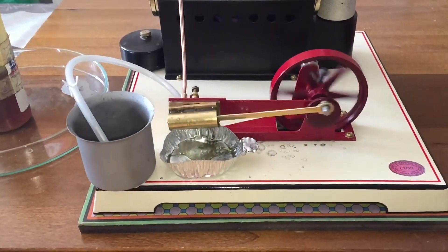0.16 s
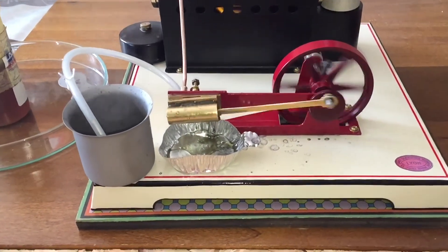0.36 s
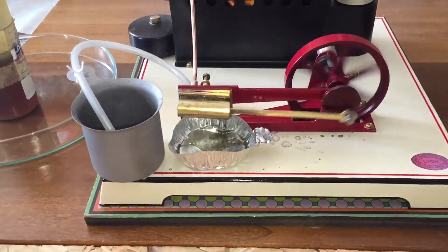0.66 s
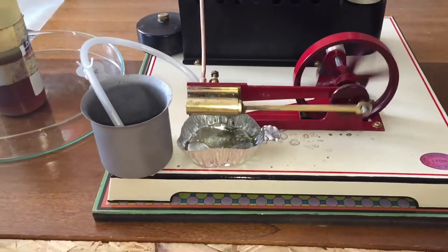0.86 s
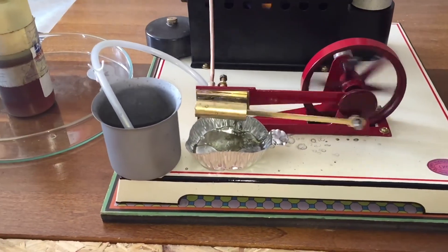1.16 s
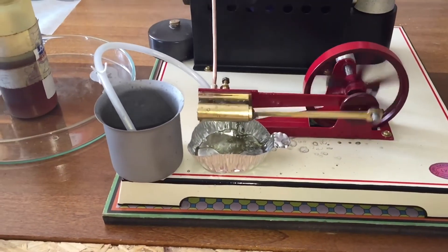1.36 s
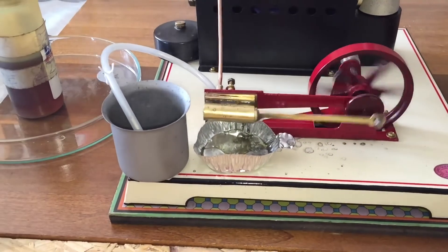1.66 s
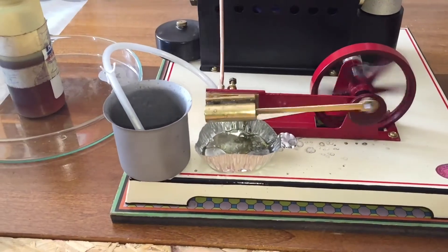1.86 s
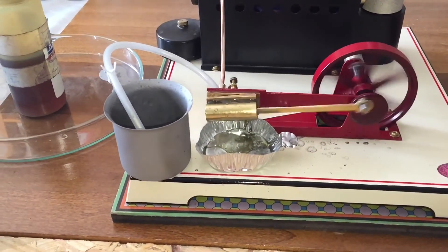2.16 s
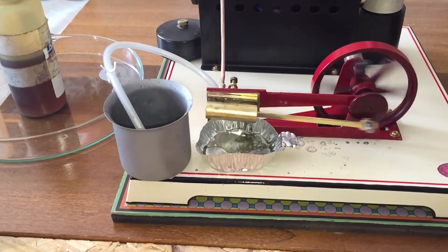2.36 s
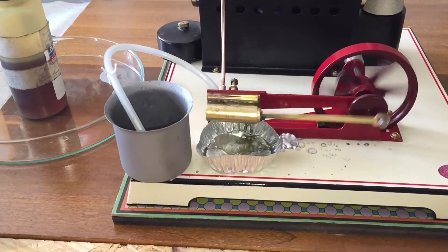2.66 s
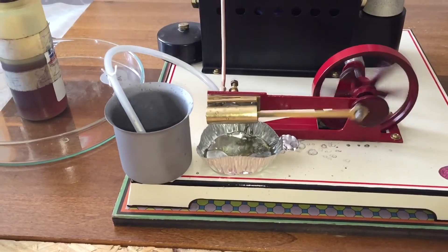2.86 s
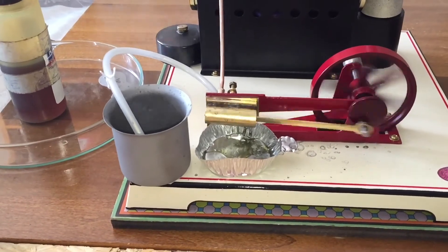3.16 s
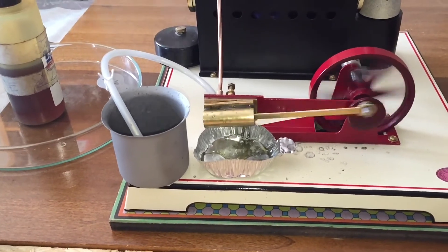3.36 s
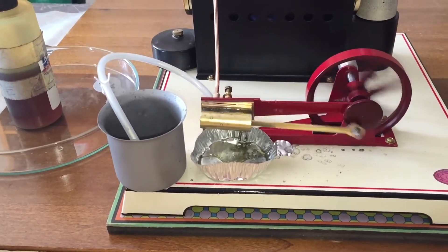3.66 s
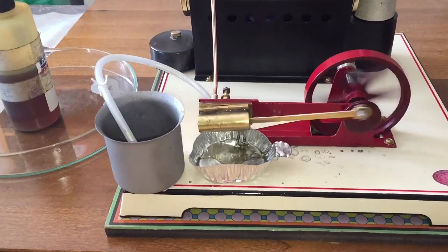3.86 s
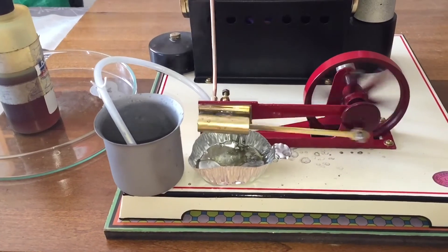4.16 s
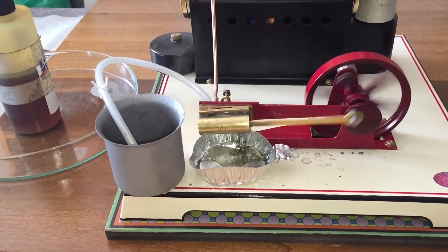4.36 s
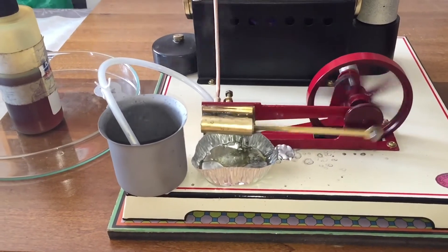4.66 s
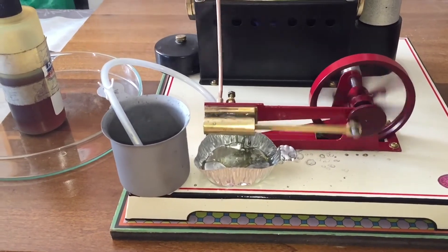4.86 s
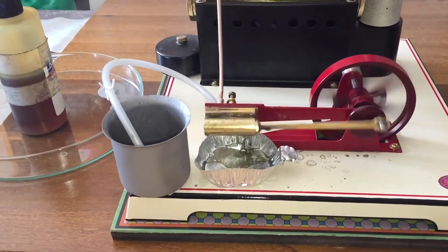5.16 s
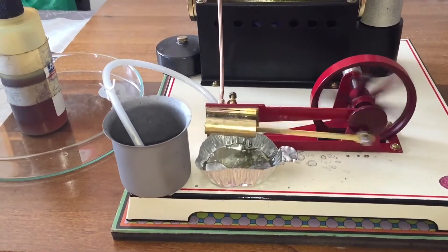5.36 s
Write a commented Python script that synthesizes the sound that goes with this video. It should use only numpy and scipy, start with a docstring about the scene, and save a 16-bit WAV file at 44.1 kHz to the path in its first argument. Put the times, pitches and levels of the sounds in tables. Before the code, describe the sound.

A toy steam engine runs on a thin base plate on a wooden table, recorded closely by a phone in a small room. At 0 s the tail of one steam puff fades over a soft metallic whirr; the next puff starts near 0.1 s. Puffs come about five per second, nearly six at 1 s, about seven at 2 s and just over eight from 4 s to the end at 5.5 s. Each is a bright, gritty hiss lasting roughly half a turn, with a hollow hoot around 1.6 kHz from the hose and a metallic cup ring. At its start the cylinder slaps and the loose crank knocks, a hard tick followed by a short plate clank and bounce. Knocks strengthen until about 2 s. Tiny toots stand out near 0.6, 0.9, 1.4 and 3 s. Light taps and thin seeping steam fill the gaps; table rumble and, after 3 s, a deep murmur stay faint.

```python
"""The tail of a steam puff and a soft mechanical whirr open; then a toy steam engine puffs and knocks ever faster.
It stands on a thin base plate on a wooden table, close to a phone. The exhaust is noise gated by a port for
about half of each turn, colouring and hooting as it leaves a hose into a metal cup. The cylinder slaps, and
the loose crank and rod knock and bounce: short blows into decaying modes of frame, plate, base and table.
Brief toots, light taps, seeping steam, table rumble and a deep house murmur fill in around them."""
import sys
import numpy as np
from scipy import signal
from scipy.fft import rfft, irfft
from scipy.io import wavfile
from scipy.ndimage import uniform_filter1d

SR = 44100
rng = np.random.default_rng(int(sys.argv[2]) if len(sys.argv) > 2 else 0)


def transcribe(u):
    """Save the signal u as a 16-bit wav file named by the first command-line argument.

    u: samples, shape (n,) or (channels, n), limited to [-1, 1]; the rate is SR.
    q: integer samples, one column per channel.
    """
    v = np.clip(np.atleast_2d(u).T, -1, 1)
    q = np.round(v * 32767).astype(np.int16)
    wavfile.write(sys.argv[1], SR, q)


N = 242991  # length in samples

# flywheel speed: (time [s], speed [turns/s])
SPEED = [(0, 4.573), (1, 5.846), (2, 6.829), (3, 7.561), (4, 8.197), (5.51, 8.413)]
START_TURN = 0.511  # share of the turn already past at 0 s; the exhaust port opens at each whole turn

# steam flow through the port over one turn: (share of turn [0-1], level [dB])
PORT = [(0, -14), (.04, -2.5), (.09, 2), (.2, 0.5), (.3, 1), (.41, 1.5), (.46, -2.5), (.52, -13.5),
        (.6, -50), (.93, -47), (1, -6.5)]
# colour of the jet in the cup, with its dips: (frequency [Hz], relative density [dB per Hz])
JET_COLOUR = [(80, -46), (200, -16), (700, -10.5), (1100, -20), (1600, -9), (3400, -6.5), (4350, -21),
              (4800, -8.5), (5900, -6.5), (7000, -7.5), (7300, -17), (7700, -9.5), (9800, -14.5),
              (10500, -17.5), (11100, -11), (11700, -18), (12500, -10), (14000, -13.5), (14800, -4),
              (15500, -13.5)]
# air and wall resonances of the cup, before the jet colour: (frequency [Hz], width [Hz], gain over the jet [dB])
CUP = [(803, 92, 6.5), (5114, 27.3, 9), (5144, 140, 10.5), (5800, 640, -5), (7500, 230, -2.5),
       (7970, 100, -9), (8920, 150, 1.5), (9900, 140, -0.5), (11130, 80, 5.5), (11800, 100, 0.5),
       (12630, 460, -1), (13640, 460, -8.5)]
# hooting note of the hose: (time [s], frequency [Hz])
HOSE_NOTE = [(0, 1555), (1, 1539), (2, 1565), (3, 1582), (4, 1609), (5.51, 1594)]
HOSE_WIDTH_HZ = 105
HISS_DB, HISS_SCATTER_DB = -38.5, 0.53  # before the port; scatter from puff to puff
HOSE_SWAY_DB = 2  # the hose shifts in the cup, so each puff favours other resonances
HOOT_DB, HOOT_DB_PER_TURN_S, HOOT_SCATTER_DB = -44.5, -0.67, 2.0  # before the port, at 8 turns/s

# loose parts rattling round the turn, at 8 turns/s: (share of turn [0-1], relative level [dB])
RATTLE = [(0, -66), (.2, -50), (.45, -59), (.6, -56), (.8, -54), (.9, -60), (1, -33)]
RATTLE_DB_PER_TURN_S = 3.5  # louder with speed
# modes that keep ringing between blows: (frequency [Hz], relative level [dB], t60 [s])
WHIRR = [(700, -17.5, 0.1), (781, -7, 0.14), (896, -4.5, 0.15), (1225.5, -3, 0.13), (1325, -10.5, 0.15),
         (1563, -10, 0.21), (1782, -2, 0.1), (2140, -6, 0.071), (2570, -13, 0.048), (2922, -3.5, 0.028)]

# steam seeping past the port face, at 5.5 turns/s: (share of turn [0-1], level [dB])
SEEP = [(0, -48), (.45, -50.5), (.6, -54), (.8, -62.5), (.95, -59), (1, -68)]
# colour of the seeping steam: (frequency [Hz], relative density [dB per Hz])
SEEP_COLOUR = [(60, -14), (300, -8), (1000, 5), (2000, -0.5), (3500, -8), (4400, -8.5), (5000, -5.5),
               (8500, -8.5), (10500, -11.5), (15500, -16)]
SEEP_DB_PER_TURN_S = 1.5

# flywheel shaking the table: (time [s], level [dB])
RUMBLE = [(0, -69), (1.5, -68.5), (2.5, -63), (3.5, -68), (4.5, -59.5), (5.51, -63.5)]
# deep murmur of the house: (time [s], level [dB])
HOUSE = [(0, -80), (2.8, -79), (3.1, -63.5), (4.5, -65), (5.51, -70)]
# colour of the house murmur: (frequency [Hz], relative density [dB per Hz])
HOUSE_COLOUR = [(30, -13), (50, 0), (75, -1), (120, -18), (300, -48), (2000, -52)]

# modes of the engine frame: (frequency [Hz], relative level [dB], t60 [s])
FRAME = [(1229, 0.5, 0.034), (1412, -5, 0.037), (1500, -6, 0.041), (1583, -3.5, 0.068), (1803, 1.5, 0.03),
         (2134, -5, 0.024), (2242, -9.5, 0.047), (2558, -7.5, 0.039), (2875, -3.5, 0.033), (3332, 2, 0.013),
         (3700, -16, 0.085), (4140, -9, 0.026)]
# modes of the base plate: (frequency [Hz], relative level [dB], t60 [s])
PLATE = [(549.4, -21, 0.11), (630, -9.5, 0.034), (700, -7.5, 0.057), (778.3, -5.5, 0.065),
         (909.5, -2, 0.13)]
# dull modes of the hollow base: (frequency [Hz], relative level [dB], t60 [s])
THUD = [(265, -4, 0.049), (308, 1.5, 0.035), (407, -3.5, 0.059)]
# low modes of the wooden table: (frequency [Hz], relative level [dB], t60 [s])
TABLE = [(94.3, -1.5, 0.055), (139.2, -1, 0.25), (166, -11.5, 0.18)]
# modes of the cylinder: (frequency [Hz], relative level [dB], t60 [s])
CYLINDER = [(673, -8, 0.068), (880, -13, 0.028), (1160, -6, 0.066), (1357, -1.5, 0.093), (1554, -3, 0.03),
            (1786, -5, 0.088), (2070, -4, 0.026), (2570, -2.5, 0.091), (2919, -0.5, 0.055),
            (3320, -19, .04), (3790, -10.5, 0.035), (4520, -7.5, 0.014)]
# modes of the crank pin: (frequency [Hz], relative level [dB], t60 [s])
PIN = [(1390, -3, 0.0048), (2730, 3, 0.0018), (4060, 0, 0.0095), (6340, -2, 0.0022)]
UPPER_HZ = 2200  # modes above this follow the hardness of the blow

# light taps once a turn, at 7 turns/s:
# (share of turn [0-1], frame ring [dB], plate ring [dB], rise with speed [dB per turn/s])
TAP_PLACES = [(.44, -57, -45.5, 3), (.55, -54.5, -52, -3.5), (.89, -58.5, -56, 8)]
TAP_SCATTER_TURN, TAP_SCATTER_DB = 0.03, 3

# rocking cylinder slapping its port face as the pressure lets go: (time [s], ring level [dB])
SLAPS = [(0.1117, -45), (0.3159, -41), (0.5139, -36), (0.6977, -35.5), (0.878, -40), (1.0525, -39),
         (1.219, -37.5), (1.3828, -37.5), (1.5379, -33.5), (1.6928, -35.5), (1.8471, -37.5), (1.994, -36.5),
         (2.139, -36.5), (2.279, -45), (2.423, -38), (2.561, -37), (2.6986, -37), (2.835, -39),
         (2.9696, -45), (3.1, -40.5), (3.2273, -49), (3.3584, -36.5), (3.484, -37), (3.612, -37),
         (3.7366, -37.5), (3.8595, -44), (3.983, -56), (4.1112, -44), (4.23, -53), (4.3536, -46),
         (4.4715, -36), (4.5914, -46), (4.71, -49), (4.8333, -33.5), (4.952, -44), (5.072, -40),
         (5.1929, -36), (5.3113, -38.5), (5.4308, -39)]
SLAP_UPPER_DB, SLAP_UPPER_SCATTER_DB = -3, 3.5  # upper cylinder modes relative to the ring

# crank and rod taking up their play: (time [s], pin tick [dB], frame ring [dB], plate ring [dB],
# dull thud [dB], table thump [dB])
KNOCKS = [(0.13, -49, -45, -28, -56, -55), (0.3272, -37, -41, -27, -59, -61),
          (0.5219, -43, -30, -31, -42, -77), (0.7077, -31, -32.5, -28.5, -48, -57),
          (0.889, -51, -36, -30, -58, -72), (0.8951, -24, -31.5, -33, -36.5, -69),
          (1.0664, -50, -45, -28.5, -47, -61), (1.2326, -35, -33, -31, -47, -53),
          (1.3914, -39, -34, -38, -41.5, -50.5), (1.5499, -29, -35, -22.5, -44, -48),
          (1.7032, -29, -40, -21, -39.5, -50), (1.855, -28.5, -32.5, -28, -53, -48),
          (2.0037, -32, -30, -24, -45.5, -47.5), (2.1503, -26.5, -38, -28, -44.5, -47),
          (2.2919, -25, -38, -23.5, -49, -52), (2.4318, -59, -29.5, -24.5, -59, -49),
          (2.5731, -38, -33, -25, -43, -45), (2.708, -40, -33.5, -24, -55, -56),
          (2.8446, -25.5, -34, -23, -42, -69), (2.9789, -26, -35, -25.5, -41, -61),
          (3.1101, -23.5, -43, -25, -46, -74), (3.2401, -24.5, -39, -24, -50, -65),
          (3.37, -30, -31.5, -23.5, -60, -45), (3.4977, -22.5, -37, -25.5, -58, -65),
          (3.62, -30, -34, -24, -45, -50), (3.7469, -24, -38, -26.5, -36.5, -52),
          (3.8741, -44, -29.5, -24.5, -51, -52), (3.9962, -32.5, -31.5, -25.5, -43, -67),
          (4.1188, -25, -39, -24.5, -44, -46), (4.2346, -54, -31.5, -28.5, -35, -49),
          (4.3624, -34, -30.5, -27.5, -34, -52), (4.4817, -32, -32.5, -27, -41, -58),
          (4.6054, -27, -36.5, -27, -52, -58), (4.726, -51, -34, -28, -58, -48.5),
          (4.8256, -35, -50, -43, -48, -75), (4.8457, -22, -46, -24.5, -42, -44),
          (4.965, -25, -41, -27.5, -50, -50), (5.0794, -28, -37, -29, -52, -62),
          (5.206, -28, -39.5, -25, -52.5, -44), (5.3243, -31, -44, -28, -66, -52),
          (5.4428, -31.5, -37, -27.5, -46, -53)]
RING_LAG_S = 0.001002  # the frame answers just after the tick
PLATE_LAG_S = 0.002007  # the blow reaches the plate through the frame
UPPER_DB, UPPER_PER_TICK = -34, 0.35  # upper frame modes for a tick of -32 dB; harder ticks wake them more
BOUNCE_S, BOUNCE_SCATTER_S = 0.009, 0.002  # the rod rebounds once
BOUNCE_FRAME_DB, BOUNCE_PLATE_DB, BOUNCE_THUD_DB, BOUNCE_THUMP_DB = -11, -8.5, -8, -7
BOUNCE_SCATTER_DB = 3
PLATE_FREE_S, PLATE_DAMPED_DB = 0.022, -8  # the plate rings freely until the rod loads the frame again

# slugs of water leaving the hose make it toot: (centre time [s], peak level [dB])
TOOTS = [(0.198, -34), (0.392, -43), (0.582, -24), (0.923, -25.5), (1.093, -40), (1.438, -28.5),
         (1.572, -37), (2.314, -32), (2.338, -34.5), (2.991, -21), (3.153, -35), (3.908, -33), (4.159, -32),
         (4.276, -34), (4.5, -31), (4.881, -32)]
TOOT_S = 0.011

ROOM_T60_S, ROOM_DB = 0.42, -26
TOP_HZ = 15700


def undb(db):
    """Decibels to amplitude gain."""
    return 10 ** (np.asarray(db) / 20)


def unit(x):
    """A signal brought to rms 1."""
    return x / np.sqrt(np.mean(x ** 2))


def along(table, at):
    """Second column of a table, read at any value of the first."""
    return np.interp(at, *np.transpose(table)[:2])


def clock():
    """Time of every sample in seconds."""
    return np.arange(N) / SR


def coloured(spectrum, x):
    """A sound filtered by a spectrum drawn over log frequency, brought to rms 1."""
    hz, db = np.transpose(spectrum)
    bins = np.arange(1, N // 2 + 2) * SR / N
    gain = undb(np.interp(np.log(bins), np.log(hz), db))
    return unit(irfft(rfft(x) * gain, N))


def resonant(hz, width, drive):
    """A drive ringing in one resonance, gain 1 at its centre."""
    return signal.lfilter(*signal.iirpeak(hz, hz / width, fs=SR), drive)


def walk(rate):
    """Random wander of rms 1, with a new target rate times a second."""
    step = int(SR / rate)
    targets = rng.standard_normal(N // step + 1)
    return unit(uniform_filter1d(np.repeat(targets, step), step)[:N])


def ring(modes, times, db, scatter_db, push_s, upper_db=0):
    """Blows of push_s into decaying modes; every blow excites each mode a little differently."""
    at = np.clip((np.asarray(times) * SR).astype(int), 0, N - 1)
    chance = rng.standard_normal((len(at), len(modes)))
    out = np.zeros(N)
    for k, (hz, mode_db, t60) in enumerate(modes):
        blow_db = db + mode_db + scatter_db * chance[:, k] + upper_db * (hz > UPPER_HZ)
        blows = np.bincount(at, undb(blow_db), N)
        pole = np.exp(2j * np.pi * hz / SR - np.log(1000) / (t60 * SR))
        sign = (-1) ** k  # neighbouring modes start in opposite directions
        out += sign * signal.lfilter([1], [1, -pole], blows).imag
    return uniform_filter1d(out, max(int(push_s * SR), 1))


def chattering(modes, s, db, upper_db, spread_s, loss_db):
    """A blow followed by two weaker rebounds within spread_s."""
    first_lag, second_lag = rng.random((len(s), 2)).T * spread_s
    out = 0
    for lag, drop in ((0, 0), (first_lag, loss_db), (second_lag, loss_db)):
        out = out + ring(modes, s + lag, db - drop, 2.97, 0.00008, upper_db)
    return out


def once_a_turn(turn, share):
    """Times at which the crank passes a share of its turn; -1 where it never does."""
    return np.interp(np.arange(int(turn[-1]) + 1) + share, turn, clock(), left=-1, right=-1)


def exhaust(turn, speed):
    """Hiss gated by the port, fluttering with wet steam; it sets cup and hose ringing."""
    puff = turn.astype(int)
    chance = rng.standard_normal((puff[-1] + 1, 2 + len(CUP))).T
    hiss_chance, hoot_chance, cup_chance = chance[0], chance[1], chance[2:]
    flow = undb(along(PORT, turn % 1) + 1.25 * walk(120))
    hiss = flow * undb(HISS_DB + HISS_SCATTER_DB * hiss_chance[puff])
    jet = hiss * rng.standard_normal(N)
    rings = 0
    for (hz, width, db), own in zip(CUP, cup_chance):
        swayed = jet * undb(HOSE_SWAY_DB * own[puff])
        rings = rings + undb(db) * resonant(hz, width, swayed)
    steam = coloured(JET_COLOUR, jet + rings) * np.sqrt(np.mean(hiss ** 2))
    hoot_db = HOOT_DB + HOOT_DB_PER_TURN_S * (speed - 8) + HOOT_SCATTER_DB * hoot_chance[puff]
    gusts = flow * undb(hoot_db + 1.5 * walk(80))
    return steam + hoot(gusts)


def hoot(gusts):
    """Noisy gusts ringing in the hose, whose note drifts; steady gusts of 1 give rms 1."""
    pole = np.exp(-np.pi * HOSE_WIDTH_HZ / SR)
    noise = rng.standard_normal(N) + 1j * rng.standard_normal(N)
    swing = signal.lfilter([np.sqrt(1 - pole ** 2)], [1, -pole], gusts * noise)
    hz = along(HOSE_NOTE, clock()) * (1 + 0.01191 * walk(15))
    return (swing * np.exp(2j * np.pi * np.cumsum(hz) / SR)).real


def rattle(turn, speed, per_s=400):
    """Dense, soft random contacts of bearings and loose parts keep the freest modes humming."""
    place, size = rng.random((int(per_s * N / SR), 2)).T
    s = place * N / SR
    at = (s * SR).astype(int)
    db = along(RATTLE, turn[at] % 1) + RATTLE_DB_PER_TURN_S * (speed[at] - 8)
    db = db - 3.1 * np.log(size + 0.046)  # a few contacts stand out
    return ring(WHIRR, s, db - 7.0, 3.5, 0.00015)


def seep(turn, speed):
    """A thin hiss of leaking steam that sags as the cylinder pressure falls."""
    db = along(SEEP, turn % 1) + SEEP_DB_PER_TURN_S * (speed - 5.5) + 1.3 * walk(60)
    return coloured(SEEP_COLOUR, rng.standard_normal(N)) * undb(db)


def rumble():
    """Noise ringing in the table's low modes."""
    body = sum(undb(db) * resonant(hz, 17.0, rng.standard_normal(N)) for hz, db, _ in TABLE)
    return unit(body) * undb(along(RUMBLE, clock()))


def house():
    """A faint, slowly swelling bass floor of filtered noise."""
    db = along(HOUSE, clock()) + 1.2 * walk(2.84)
    return coloured(HOUSE_COLOUR, rng.standard_normal(N)) * undb(db)


def taps(turn, speed):
    """Soft blows once a turn that wake mostly the lower modes of frame and plate."""
    out = 0
    for share, frame_db, plate_db, db_per_turn_s in TAP_PLACES:
        lag, frame_size, plate_size = rng.standard_normal((int(turn[-1]) + 1, 3)).T
        s = once_a_turn(turn, share + TAP_SCATTER_TURN * lag)
        db = db_per_turn_s * (along(SPEED, s) - 7)
        db = db - 200 * (s < 0)  # silence taps outside the scene
        out = out + ring(FRAME, s, frame_db + db + TAP_SCATTER_DB * frame_size, 5.1, 0.00015, upper_db=-8.5)
        out = out + ring(PLATE, s, plate_db + db + TAP_SCATTER_DB * plate_size, 1.3, 0.0002)
    return out


def slaps():
    """The cylinder's own ring, struck with two rebounds near the start of each puff."""
    s, db = np.transpose(SLAPS)
    upper_db = SLAP_UPPER_DB + SLAP_UPPER_SCATTER_DB * rng.standard_normal(len(s))
    return chattering(CYLINDER, s, db, upper_db, spread_s=0.004, loss_db=1.5)


def ticks():
    """Hard, very short contacts of the crank pin that open each knock."""
    s, db = np.transpose(KNOCKS)[:2]
    return ring(PIN, s, db, scatter_db=3.0, push_s=0.00003)


def knocks():
    """Each knock is a blow and a bounce, chattering in the frame and felt in plate, base and table."""
    s, tick_db, frame_db, plate_db, thud_db, thump_db = np.transpose(KNOCKS)
    lag, frame_size, plate_size, thud_size = rng.standard_normal((len(s), 4)).T

    def bounced(db, loss_db, size):
        """Levels of the blows, then of their bounces."""
        return np.r_[db, db + loss_db + BOUNCE_SCATTER_DB * size]

    upper_db = np.tile(UPPER_DB + UPPER_PER_TICK * (tick_db + 32) - frame_db, 2)
    s = np.r_[s, s + BOUNCE_S + BOUNCE_SCATTER_S * lag] + RING_LAG_S
    frame_db = bounced(frame_db, BOUNCE_FRAME_DB, frame_size)
    plate_db = bounced(plate_db, BOUNCE_PLATE_DB, plate_size)
    thud_db = bounced(thud_db, BOUNCE_THUD_DB, thud_size)
    thump_db = bounced(thump_db, BOUNCE_THUMP_DB, frame_size)  # bounces share the frame's scatter
    frame = chattering(FRAME, s, frame_db, upper_db, spread_s=0.006, loss_db=6.0)
    plate = ring(PLATE, s + PLATE_LAG_S, plate_db, 1.54, 0.00012) * damping()
    thud = ring(THUD, s, thud_db, 2.7, 0.00079)
    thump = ring(TABLE, s, thump_db, 2.1, 0.0023)
    return frame + plate + thud + thump


def damping():
    """Gain on the plate ring: full just after each knock, then held down."""
    free = np.zeros(N)
    for s in np.transpose(KNOCKS)[0]:
        free[int(s * SR):int((s + PLATE_FREE_S) * SR)] = 1
    eased = uniform_filter1d(free, int(0.0032 * SR))
    return undb(PLATE_DAMPED_DB * (1 - eased))


def toots():
    """Short clear sine notes near the pitch of the hose, each under a smooth swell."""
    s, db = np.transpose(TOOTS)
    peaks = np.bincount((s * SR).astype(int), undb(db), N)
    swell = np.convolve(peaks, np.hanning(int(TOOT_S * SR)), "same")
    hz = along(HOSE_NOTE, clock()) * (1 + 0.015 * walk(12))
    return swell * np.sin(2 * np.pi * np.cumsum(hz) / SR)


def room(x):
    """The sound plus a short diffuse tail of decaying noise."""
    s = np.arange(int(0.5 * SR)) / SR
    tail = rng.standard_normal(len(s)) * undb(-60 * s / ROOM_T60_S) * (s > 0.004)
    tail = tail / np.sqrt(np.sum(tail ** 2))
    return x + undb(ROOM_DB) * signal.fftconvolve(x, tail)[:N]


def scene():
    """The engine's sounds in the room, over seeping steam, rumble and house murmur."""
    speed = along(SPEED, clock())
    turn = START_TURN + np.cumsum(speed) / SR
    steam = exhaust(turn, speed) + toots()
    contacts = rattle(turn, speed) + taps(turn, speed) + slaps() + ticks() + knocks()
    return (room(steam + contacts) + seep(turn, speed) + rumble() + house())[None]


def record(dry):
    """The phone drops the deepest bass and cuts the top."""
    bass_cut = signal.sosfilt(signal.butter(4, 45, "high", fs=SR, output="sos"), dry)
    return signal.sosfilt(signal.ellip(12, 0.2, 80, TOP_HZ, fs=SR, output="sos"), bass_cut)


dry = scene()
out = record(dry)
transcribe(out)
```